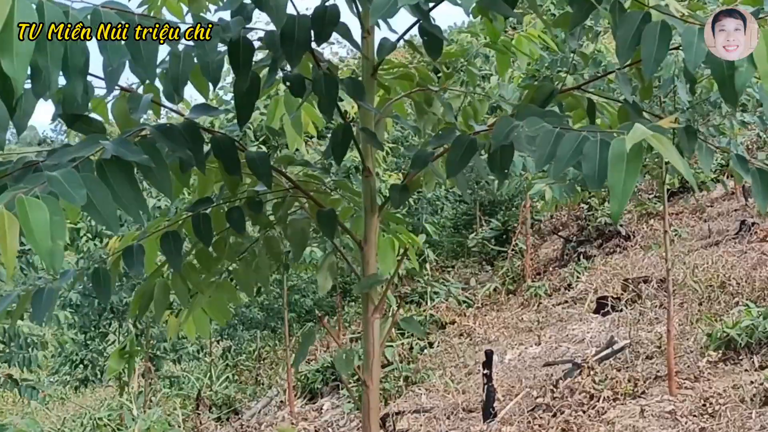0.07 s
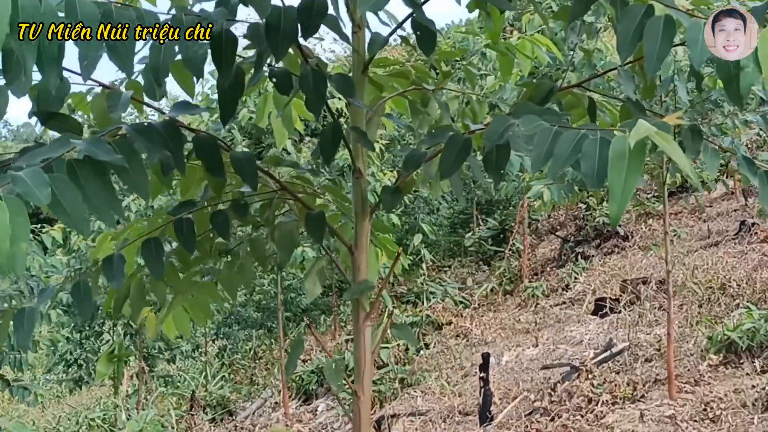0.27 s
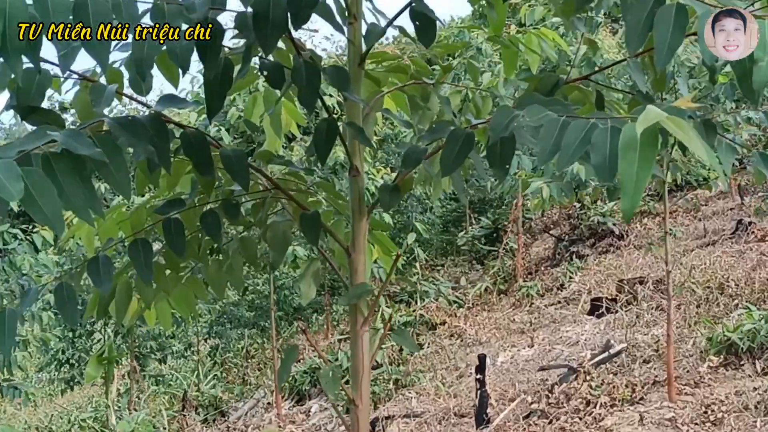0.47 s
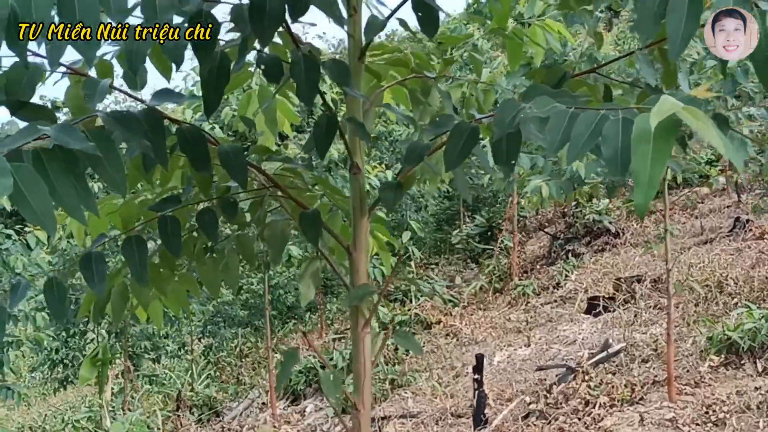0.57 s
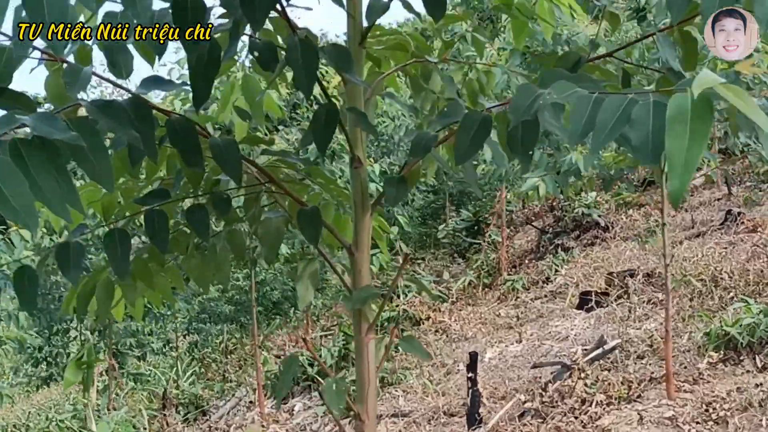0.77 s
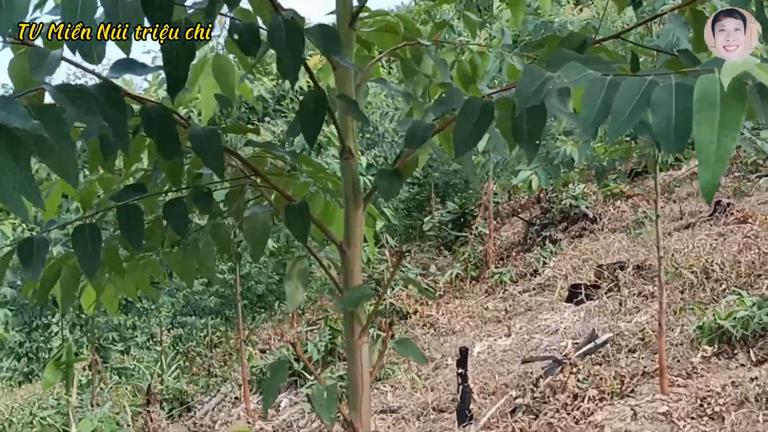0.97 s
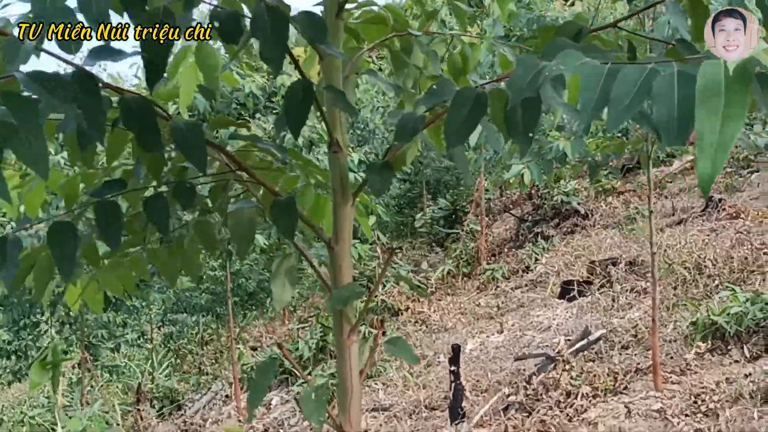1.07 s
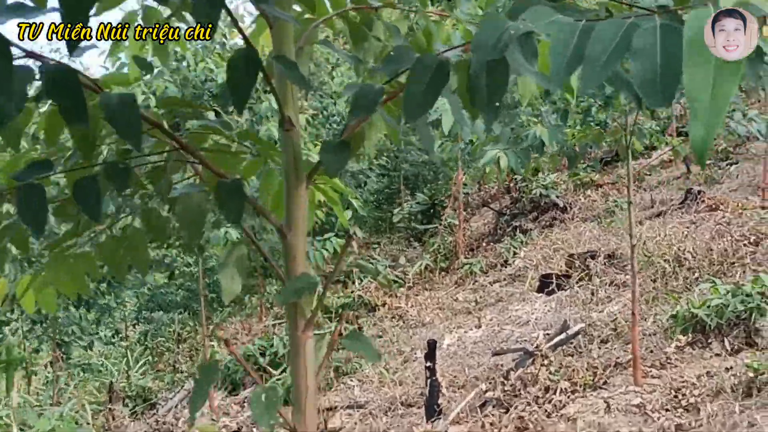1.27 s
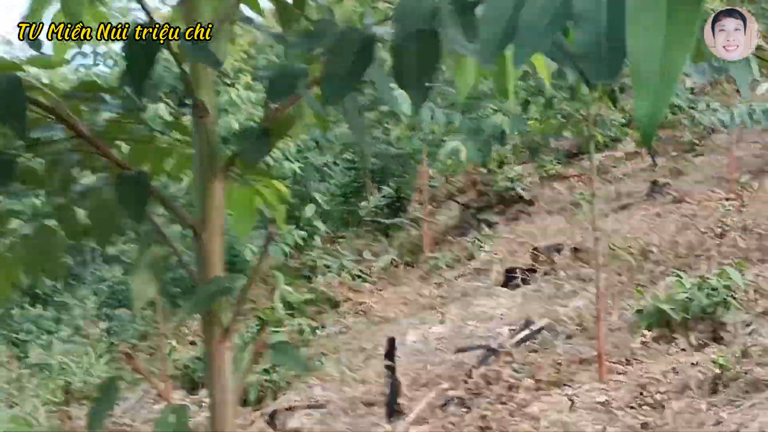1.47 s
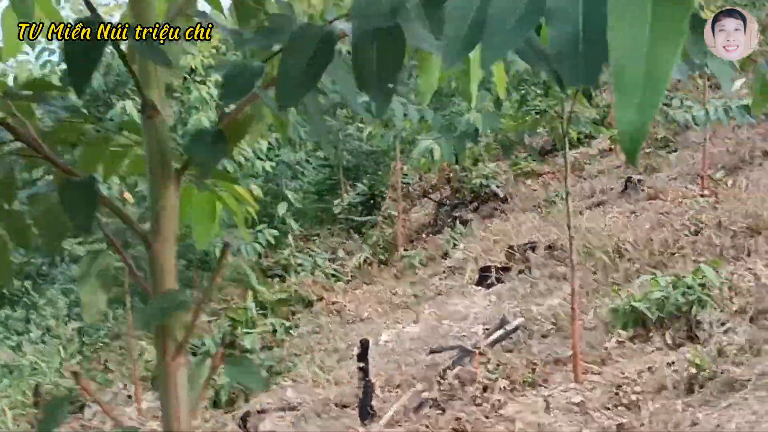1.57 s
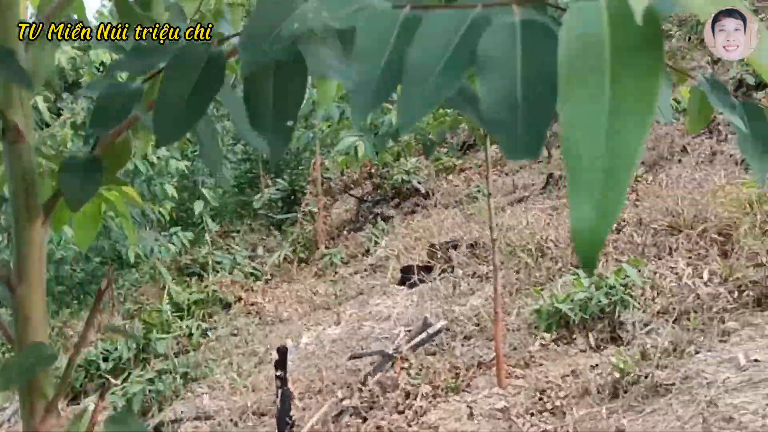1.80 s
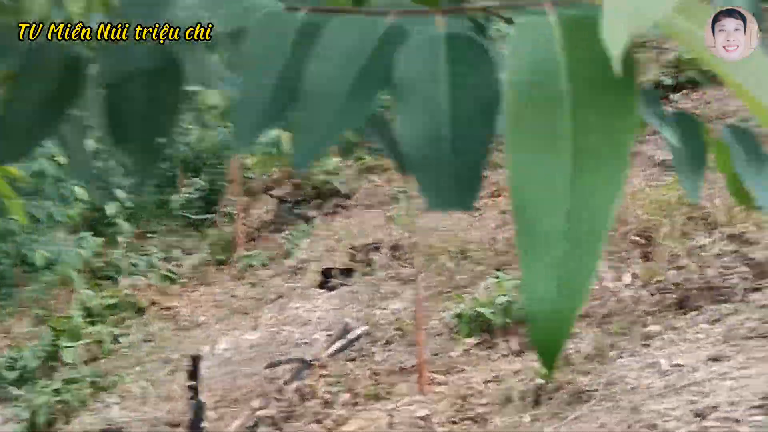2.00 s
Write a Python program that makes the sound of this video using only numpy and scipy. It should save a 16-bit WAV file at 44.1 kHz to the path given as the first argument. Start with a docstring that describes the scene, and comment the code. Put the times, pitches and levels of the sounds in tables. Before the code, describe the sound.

Stiff leaves brush and crackle against the microphone, after faint breeze and a small bird.

```python
"""First a soft hiss of far foliage on a breezy hillside, with two falling calls of a small bird,
puffs of wind on the microphone and faint handling bumps. From 1.2 s a leafy branch sweeps across
the camera: stiff leaves catch and slip in a dense crackle, flick and snap, and their stalks knock
on the hollow housing."""
import sys
import numpy as np
from scipy import signal
from scipy.fft import rfft, irfft, next_fast_len
from scipy.io import wavfile
from scipy.ndimage import uniform_filter1d, map_coordinates

SR = 44100
rng = np.random.default_rng(int(sys.argv[2]) if len(sys.argv) > 2 else 0)


def persist_wave(psi):
    """Save psi, clipped to +-1, as 16-bit WAV."""
    counts = np.round(np.clip(psi, -1, 1) * 32767).astype(np.int16)
    wavfile.write(sys.argv[1], SR, np.atleast_2d(counts).T)


N = 90008
T_S = np.arange(N) / SR
TOP_HZ = 15550


def amp(db):
    """Decibels to gain."""
    return 10 ** (np.asarray(db) / 20)


def unit(x):
    """Scale to rms 1."""
    return x / np.sqrt(np.mean(x ** 2) + 1e-20)


def noise():
    """White noise, rms 1."""
    return rng.standard_normal(N)


def wobble(knots_per_s):
    """Smooth random curve."""
    knots = rng.standard_normal(int(N * knots_per_s / SR) + 4)
    return map_coordinates(knots, [T_S * knots_per_s])


def fade(start_s, decay_s):
    """Sudden start, exponential decay."""
    age_s = T_S - start_s
    return (age_s >= 0) * np.exp(-np.abs(age_s) / decay_s)


def swell(peak_s, half_s):
    """Gaussian envelope, 1/e at half_s from the peak."""
    return np.exp(-((T_S - peak_s) / half_s) ** 2)


def filtered(x, response):
    """Zero-phase filter, gain response(hz)."""
    size = next_fast_len(N + SR // 2)
    return irfft(rfft(x, size) * response(np.fft.rfftfreq(size, 1 / SR)), size)[:N]


def coloured(x, spectrum):
    """x shaped by (f/Hz, gain/dB) points, rms 1."""
    points_hz, db = np.transpose(spectrum)
    return unit(filtered(x, lambda hz: amp(np.interp(np.log(hz + 1), np.log(points_hz), db))))


def band(x, lo_hz, hi_hz, order):
    """Causal band-pass."""
    hi_hz = min(hi_hz, SR / 2 - 100)
    return signal.sosfilt(signal.butter(order, [lo_hz, hi_hz], "band", fs=SR, output="sos"), x)


def around(x, hz, width_oct, order):
    """Band of x centred on hz, rms 1."""
    edge_ratio = 2 ** (width_oct / 2)
    return unit(band(x, hz / edge_ratio, hz * edge_ratio, order))


def patchy(x, depth_db, bins, frames):
    """Random gain patches in frequency and time."""
    spectra = signal.stft(x, nperseg=256)[2]
    field = uniform_filter1d(rng.standard_normal(spectra.shape), bins, axis=0)
    field = uniform_filter1d(field, frames, axis=1)
    return signal.istft(spectra * amp(depth_db * unit(field)), nperseg=256)[1][:N]


# far foliage spectrum: f/Hz, gain/dB
FOLIAGE_SPECTRUM = [(120, -3.5), (270, -7), (420, -3), (600, -8.5), (800, -15.5), (1000, -12),
                    (2200, -11.5), (3000, -13.5), (4700, -16.5), (5500, -12), (6700, -18), (7800, -30),
                    (11000, -22.5), (15400, -18.5)]

def far_foliage(start_db=-56.5, ease_db_per_s=1.5, lull_db=-2.5):
    """Different leaves hiss from moment to moment; the level eases and dips once."""
    hiss = coloured(patchy(noise(), depth_db=1.1, bins=3, frames=24), FOLIAGE_SPECTRUM)
    level_db = start_db - ease_db_per_s * T_S + lull_db * swell(peak_s=0.78, half_s=0.06)
    return amp(level_db) * hiss


# wind rumble spectrum: f/Hz, gain/dB
RUMBLE_SPECTRUM = [(20, -67), (45, 0), (70, 9.5), (100, 2.5), (150, -5.5), (300, -39), (800, -101)]
# wind puffs: peak t/s, half length/s, level/dB
WIND_PUFFS = [(0.315, 0.013, -54.5), (0.667, 0.069, -51), (0.72, 0.0088, -35), (0.95, 0.033, -40.5),
              (1.093, 0.045, -49), (1.354, 0.0087, -44), (1.866, 0.023, -52)]

def wind(breeze_db=-65):
    """Air on the microphone: light steady rumble plus puffs."""
    puffs = sum(amp(db) * swell(peak_s, half_s) for peak_s, half_s, db in WIND_PUFFS)
    return (amp(breeze_db) + puffs) * coloured(noise(), RUMBLE_SPECTRUM)


# hand bumps: t/s, level/dB, decay/s
HAND_BUMPS = [(.507, -44.5, 0.0089), (.566, -48.5, 0.014), (0.607, -51.5, 0.034), (0.718, -41, 0.0053)]
# bump spectrum: f/Hz, gain/dB
BUMP_SPECTRUM = [(60, 7), (170, 5.5), (500, 6.5), (900, -2), (1950, -2.5), (2600, -11), (8000, -25)]

def handling():
    """Soft bumps of the hand on the camera."""
    envelope = sum(amp(db) * fade(start_s, decay_s) for start_s, db, decay_s in HAND_BUMPS)
    return envelope * coloured(noise(), BUMP_SPECTRUM)


def whistle(hz, waver=0.01076):
    """Sine of wavering pitch, rms 1."""
    pitch_hz = hz * (1 + waver * wobble(knots_per_s=150.4))
    return np.sqrt(2) * np.sin(2 * np.pi * np.cumsum(pitch_hz) / SR)


def tree_echo(x, echo_db=-5.5, t60_s=0.32):
    """Trees scatter x into a short diffuse tail."""
    tail = noise() * amp(-60 * T_S / t60_s)
    return amp(echo_db) * signal.fftconvolve(x, tail / np.linalg.norm(tail))[:N]


# bird calls: t/s, level/dB
BIRD_CALLS = [(0.191, -53.5), (.722, -57)]
# notes per call: peak delay/s, half length/s, level re call/dB, rasp depth/dB
CALL_NOTES = [(.002, .018, -3, -4), (0.08, 0.018, -11, -0.5), (.12, 0.018, 0.5, -6),
              (0.171, 0.011, 0.5, -1), (0.205, 0.016, -2, 0), (0.264, 0.027, -17, 10)]
# level-pitched pips: t/s, length/s, f/Hz, level/dB
BIRD_PIPS = [(1.13, 0.11, 4170, -62), (1.642, 0.018, 4450, -52)]

def bird(top_hz=4415, fall_hz=1250, fall_s=0.26):
    """Raspy notes along a falling whistle, and short pips, among trees."""
    song = np.zeros(N)
    for start_s, call_db in BIRD_CALLS:
        fall = np.clip((T_S - start_s) / fall_s, 0, 1) ** 1.6  # ever faster
        tone = whistle(top_hz - fall_hz * fall)
        for delay_s, half_s, note_db, rasp_db in CALL_NOTES:
            rasp = 1 + amp(rasp_db) * wobble(knots_per_s=1560)
            song += amp(call_db + note_db) * swell(start_s + delay_s, half_s) * rasp * tone
    for start_s, length_s, hz, db in BIRD_PIPS:
        arch = np.sin(np.pi * np.clip((T_S - start_s) / length_s, 0, 1))
        song += amp(db) * arch * whistle(hz)
    return song + tree_echo(song)


def edge_slips(slips_per_s=850, sizes=6, spread_db=2, decay_s=0.00037):
    """Leaf edges catch and slip: tiny noise bursts, one band per slip size."""
    out = np.zeros(N)
    for hz in np.geomspace(1450, 15100, sizes):
        slips = rng.random(N) < slips_per_s / sizes / SR
        strength = amp(spread_db * np.minimum(rng.exponential(size=N), np.pi))
        envelope = signal.lfilter([1], [1, -np.exp(-1 / SR / decay_s)], slips * strength)
        out += np.sqrt(hz) * around(envelope * noise(), hz, width_oct=1.42, order=2)
    return unit(out)


# leaf friction spectrum: f/Hz, gain/dB
LEAF_SPECTRUM = [(200, -51), (400, -9), (800, -7.5), (1100, -4.5), (2050, -1), (2600, -5.5), (3250, -2.5),
                 (4800, -.5), (5600, 3), (6700, 2.5), (7500, -9), (12000, -4.5), (15300, 0)]
# slide envelopes, relative levels: t/s, mids/dB, upper mids/dB, treble/dB
SLIDE_LEVELS = [(1.197, -42.5, -32, -44), (1.216, -48.5, -28, -40), (1.229, -63, -36.5, -34.5),
                (1.256, -56.5, -40, -43), (1.304, -45.5, -33.5, -33), (1.338, -42.5, -34, -36),
                (1.37, -30, -29, -30.5), (1.391, -39.5, -24.5, -33.5), (1.405, -49, -38, -43),
                (1.44, -36, -36.5, -38.5), (1.458, -38, -26, -30.5), (1.494, -45.5, -42, -46),
                (1.517, -37.5, -39, -40), (1.549, -33.5, -29.5, -34), (1.613, -46, -35, -34.5),
                (1.647, -49, -47.5, -49.5), (1.686, -53, -47, -44.5), (1.696, -33.5, -26.5, -30),
                (1.736, -43, -34.5, -37), (1.77, -44, -35.5, -36.5), (1.868, -54, -43, -40.5),
                (1.879, -54, -29, -23), (1.896, -48, -42, -36), (1.931, -69, -50, -51),
                (1.941, -47.5, -41, -40.5), (2.035, -47.5, -38.5, -42.5)]

def sliding_leaves(start_s=1.196, onset_s=0.0012, smooth_share=0.52, gain_db=-1.5, flutter_db=1.96):
    """Friction: dense slips over a smooth hiss, under fluttering pressure."""
    friction = np.sqrt(1 - smooth_share) * edge_slips() + np.sqrt(smooth_share) * noise()
    rub = coloured(friction, LEAF_SPECTRUM)
    times_s, *levels_db = np.transpose(SLIDE_LEVELS)
    edges_hz = [0, 2233, 8400, TOP_HZ]
    out = np.zeros(N)
    for lo_hz, hi_hz, db in zip(edges_hz, edges_hz[1:], levels_db):
        part = unit(filtered(rub, lambda hz: (hz >= lo_hz) & (hz < hi_hz)))
        out += amp(np.interp(T_S, times_s, db)) * part
    pressure = amp(gain_db + flutter_db * wobble(knots_per_s=260))
    onset = np.clip((T_S - start_s) / onset_s, 0, 1)
    return pressure * onset * out


HIT_GAIN = np.sqrt(0.0031 * SR / N)  # tick and hit levels: energy referred to 3.1 ms
# bright ticks and cracks: t/s, decay/s, f/Hz, width/oct, level/dB
BRIGHT_TICKS = [(.642, 0.01, 6670, 0.76, -40), (.76, 0.00091, 9000, 2.7, -52),
                (.818, 0.0016, 12250, 0.54, -51), (1.199, 0.0029, 12500, 1.7, -31.5),
                (1.2088, 0.0027, 13370, 0.35, -14.5), (1.327, 0.0047, 5040, 1.2, -26),
                (1.602, 0.0003, 3780, 0.52, -25.5), (1.6715, .001, 4200, 0.82, -27.5),
                (1.6929, 0.00068, 11600, 1.6, -18.5), (1.7612, .0015, 7000, 2.3, -35),
                (1.7935, 0.00065, 3400, 1.8, -31.5), (1.8425, 0.00076, 2010, 1.56, -27)]

def bright_ticks():
    """Short ticks and cracks: a light touch, twig ticks, leaf flicks, the top click of one stalk hit."""
    out = np.zeros(N)
    for start_s, decay_s, hz, width_oct, db in BRIGHT_TICKS:
        out += amp(db) * around(noise() * fade(start_s, decay_s), hz, width_oct, order=2)
    return HIT_GAIN * out


# housing hollows and leaf blade ring: f/Hz, width/Hz, gain/dB
RESONANCES = [(448, 39, 4), (800, 130, -1), (1185, 54, 4.5), (2350, 290, -6), (4200, 290, 8)]

def resonate(x):
    """Housing and leaf blade boost or cut narrow bands, in series."""
    for hz, width_hz, db in RESONANCES:
        x = x + (amp(db) - 1) * band(x, hz - width_hz / 2, hz + width_hz / 2, order=1)
    return x


def contact_force(start_s, decay_s, scuff_share=0.46):
    """A sharp push and a short scuff."""
    push = unit(signal.unit_impulse(N, round(start_s * SR)))
    scuff = unit(noise() * fade(start_s, decay_s))
    return np.sqrt(1 - scuff_share) * push + np.sqrt(scuff_share) * scuff


# hits on the housing, levels before resonances:
# t/s, scuff decay/s, thud f/Hz, thud level/dB, knock f/Hz, knock level/dB, snap level/dB
STALK_HITS = [(1.3508, 0.0015, 403.5, -19.5, 1360, -20, -29.5), (1.356, 0.0033, 465, -18.5, 1350, -20, -29),
              (1.3646, 0.0018, 475, -26, 1250, -18.5, -27), (1.37, 0.0036, 485, -25.5, 1490, -17, -27),
              (1.3786, 0.0012, 680, -33, 1290, -21.5, -24.5),
              (1.3844, 0.00089, 613, -34.5, 1680, -14.5, -14), (1.4545, 0.0004, 615, -26, 1570, -15, -20),
              (1.471, 0.0013, 542, -28, 1650, -24, -25.5), (1.476, 0.0014, 620, -22.5, 1640, -26.5, -28.5),
              (1.5088, 0.0015, 604, -19.5, 1040, -21.5, -45),
              (1.5233, 0.002, 648, -21.5, 1240, -20.5, -33.5), (1.68, 0.0048, 400, -34.5, 1200, -69, -60),
              (1.6928, 0.0006, 450, -28.5, 1800, -26.5, -16), (1.7065, 0.00095, 815, -39, 1890, -37, -19),
              (1.7127, 0.002, 607, -38.5, 1430, -30.5, -22)]

def stalk_hits(snap_hz=4740, snap_oct=0.97, splinter_db=-14):
    """Stalks and leaves strike the housing; each force drives a thud, a knock and a snap."""
    out = np.zeros(N)
    for start_s, decay_s, thud_hz, thud_db, knock_hz, knock_db, snap_db in STALK_HITS:
        force = contact_force(start_s, decay_s)
        thud = around(force, thud_hz, width_oct=0.98, order=3)
        knock = around(force, knock_hz, width_oct=0.61, order=3)
        splinter = amp(splinter_db) * around(force, snap_hz, 2 * snap_oct, order=1)
        snap = unit(around(force, snap_hz, snap_oct, order=2) + splinter)
        out += amp(thud_db) * thud + amp(knock_db) * knock + amp(snap_db) * snap
    return HIT_GAIN * resonate(out)


def scene():
    """Foreground and background at one microphone."""
    foreground = sliding_leaves() + stalk_hits() + bright_ticks()
    background = handling() + bird() + far_foliage() + wind()
    return (foreground + background)[None]


def record(dry):
    """Soft peak limiting, then a steep low-pass at TOP_HZ."""
    limited = dry[0] / (1 + np.abs(dry[0]) ** 6) ** (1 / 6)
    return filtered(limited, lambda hz: 1 / (1 + (hz / TOP_HZ) ** 200))[None]


dry = scene()
out = record(dry)
persist_wave(out)
```